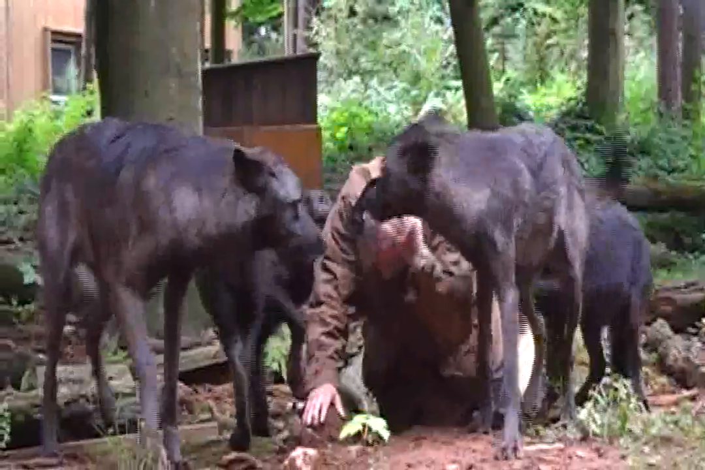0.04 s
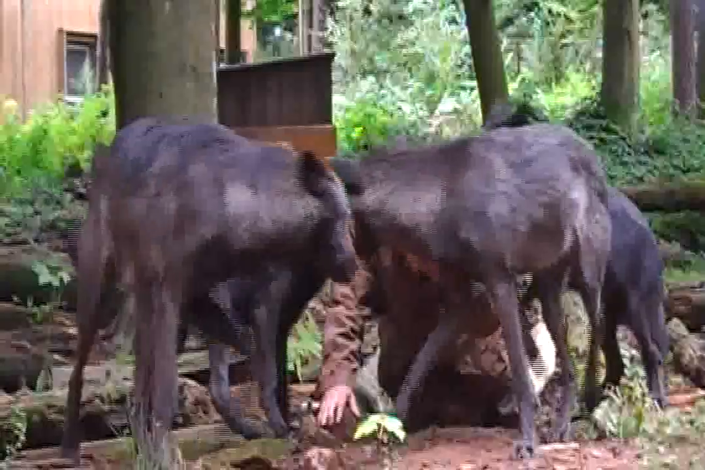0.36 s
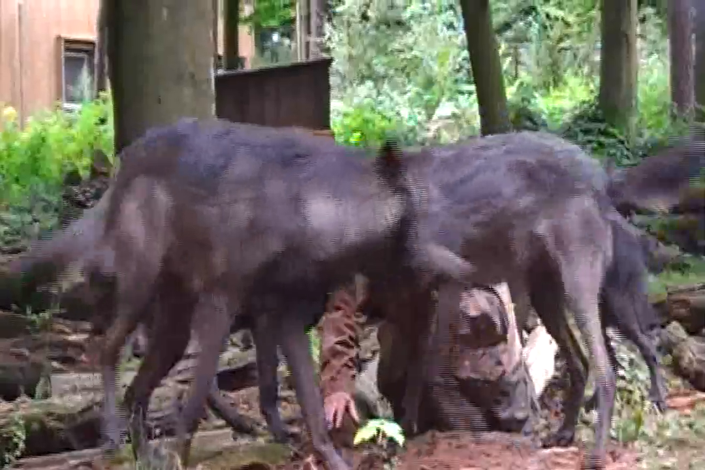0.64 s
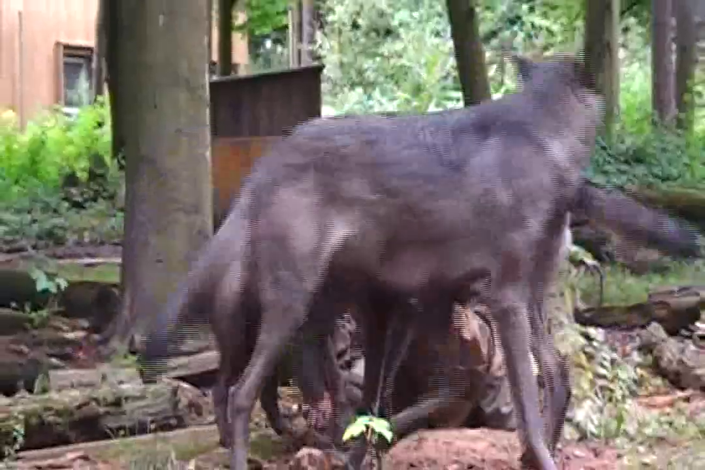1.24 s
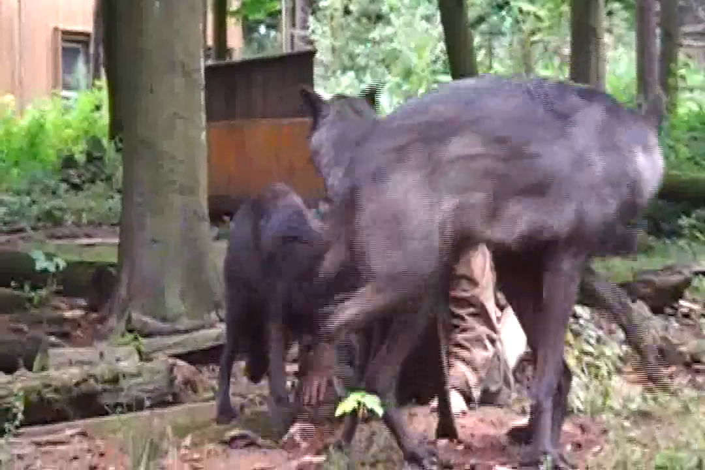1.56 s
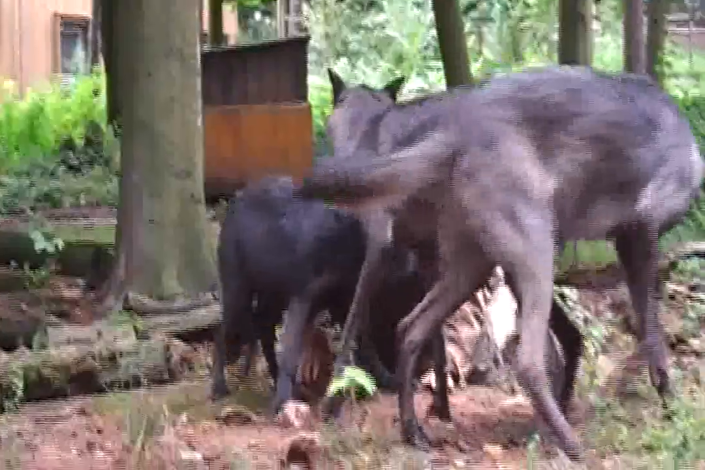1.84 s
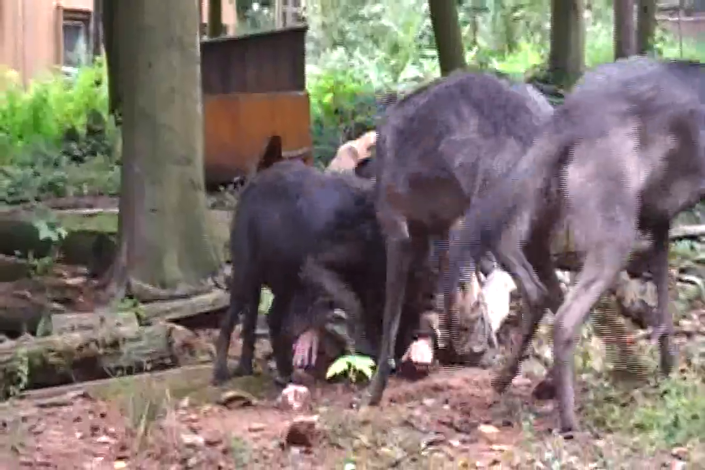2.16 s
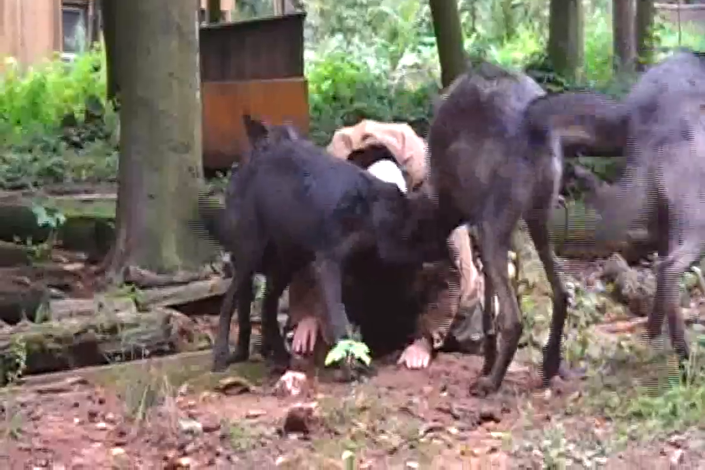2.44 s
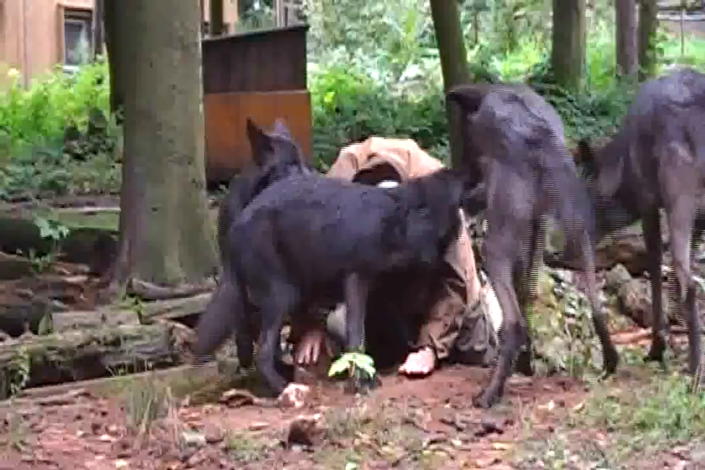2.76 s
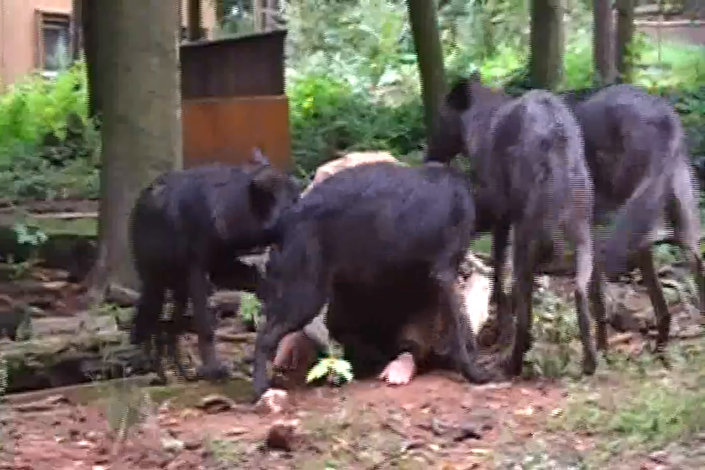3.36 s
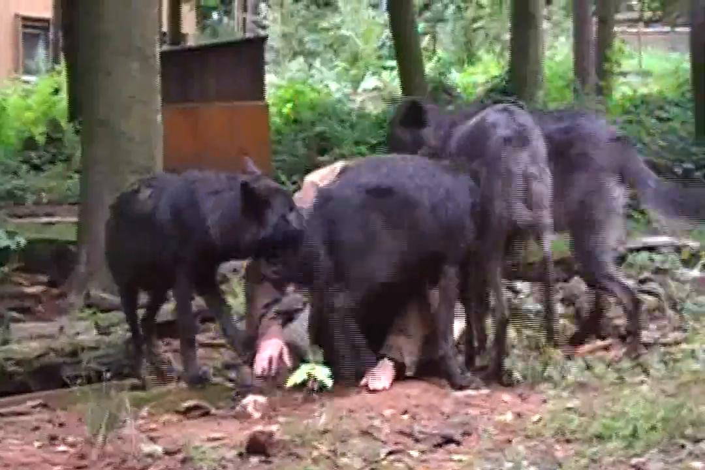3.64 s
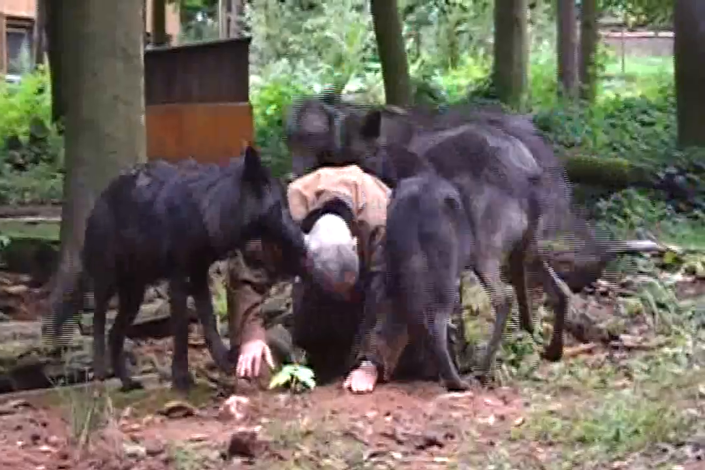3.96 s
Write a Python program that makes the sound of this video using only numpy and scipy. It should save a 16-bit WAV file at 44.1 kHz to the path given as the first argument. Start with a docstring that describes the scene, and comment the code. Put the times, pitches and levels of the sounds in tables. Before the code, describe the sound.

A wolf holds a single falling howl over thin whines and paws rustling dry leaves.

```python
"""One long, nearly pure wolf howl sinks in pitch, its overtones weakening as the mouth closes.
Pack mates mill about close by with thin nasal whines, roughened by turbulence, and a few whimpers
and snuffles. Their paws thud and rustle on dry litter, over forest air and a low rumble.
Other wolves howl faintly far off, and scattering among the trunks gives a light echo."""
import sys
import numpy as np
from scipy import signal
from scipy.fft import rfft, irfft, next_fast_len
from scipy.io import wavfile
from scipy.ndimage import uniform_filter1d, map_coordinates

SR = 44100
rng = np.random.default_rng(int(sys.argv[2]) if len(sys.argv) > 2 else 0)


def pcm_store(signal):
    """Save signal as 16-bit PCM."""
    levels = np.round(np.clip(np.atleast_2d(signal), -1, 1) * 32767)
    wavfile.write(sys.argv[1], SR, levels.astype(np.int16).T)


N = 176400
DIFFUSE_SIDE, CLOSE_SIDE = 0.4, 0.073  # stereo width: side over mid amplitude
SIDES = np.array([[.5], [-.5]])  # splits a left-right difference between the channels


def amp(db):
    """Decibels to amplitude ratio."""
    return 10 ** (np.asarray(db) / 20)


def unit(x):
    """Normalisation to rms 1."""
    return x / np.sqrt(np.mean(x ** 2) + 1e-20)


def along(points, hz):
    """Interpolation of (Hz, value) points on a log frequency axis."""
    f, v = np.transpose(points)
    return np.interp(np.log(hz + 1), np.log(f + 1), v)


def curve(rows):
    """Interpolation of (seconds, value) points to every sample, with rounded corners."""
    times, values = np.transpose(rows)
    return uniform_filter1d(np.interp(np.arange(N) / SR, times, values), size=900, mode="nearest")


def wobble(rate, count=N):
    """Smooth random modulation, rate knots a second."""
    knots = rng.standard_normal(int(count * rate / SR) + 4)
    return map_coordinates(knots, [np.arange(count) * rate / SR], order=2)


def filtered(x, response):
    """Zero-phase filtering: the spectrum of x times a gain that depends on frequency."""
    size = next_fast_len(x.shape[-1] + 8192)
    return irfft(rfft(x, size) * response(np.fft.rfftfreq(size, 1 / SR)), size)[..., :x.shape[-1]]


def noise(spectrum, width):
    """Coloured mid-side stereo noise of rms 1."""
    mid, side = filtered(rng.standard_normal((2, N)), lambda hz: amp(along(spectrum, hz)))
    return unit(np.array([mid + width * side, mid - width * side]))


def puff(centre_hz, width, count):
    """Noise through one resonance, its width in log frequency."""
    resonance = lambda hz: 1 / (1 + (np.log((hz + 1) / centre_hz) / width) ** 2)
    return unit(filtered(rng.standard_normal(count), resonance))


def gate(length, rise_s=0.015, fall_s=0.0073):
    """Time axis and rise-hold-fall envelope of a short call."""
    t = np.arange(int(length * SR)) / SR
    return t, np.sin(np.pi / 2 * np.clip(np.minimum(t / rise_s, (length - t) / fall_s), 0, 1))


def add(track, start, x):
    """Superposition of x on the track, from start in seconds."""
    part = track[max(0, round(start * SR)):][:len(x)]
    part += x[:len(part)]


def tone(hz, octave_db):
    """A gliding sine and its octave: phase is the integral of frequency."""
    phase = 2 * np.pi * np.cumsum(hz) / SR
    return np.sqrt(2) * (np.sin(phase) + amp(octave_db) * np.sin(2 * phase))


def howl(jitter=0.001, shimmer_db=0.24):
    """A harmonic series: a strong fundamental, and weak overtones that sway as the head moves."""
    # Each row: time in seconds, fundamental in Hz.
    pitch = [(0.0, 620), (0.08, 631.8), (0.23, 622.8), (0.47, 627.3), (0.65, 616.5), (0.89, 617),
             (1.04, 600.8), (1.09, 606.6), (1.21, 610), (1.3, 598.1), (1.44, 605.3), (1.55, 592),
             (1.79, 585.2), (2.13, 564.3), (2.22, 566), (2.29, 555.7), (2.4, 556.3), (2.7, 524.8),
             (2.73, 532.4), (2.82, 536.3), (2.89, 525), (2.93, 526.8), (3.07, 519.0), (3.21, 495.6),
             (3.43, 477.4), (3.54, 463.5), (3.74, 448), (3.81, 436.4), (3.92, 427), (3.99, 416)]
    # Harmonics 1 to 7. Each row: time in seconds, level in dB.
    fundamental = [(0.0, -12.5), (0.18, -10.5), (0.29, -13.0), (0.38, -12), (0.52, -14.5), (0.58, -21),
                   (0.8, -14.5), (0.87, -14.5), (0.97, -11.5), (1.02, -13.0), (1.24, -11), (1.3, -12.5),
                   (1.41, -12.0), (1.82, -15.0), (1.95, -14), (2.07, -10.5), (2.27, -10), (2.35, -12.0),
                   (2.42, -11.5), (2.55, -14), (2.6, -14.5), (2.86, -15.0), (3.04, -11.5), (3.1, -11.5),
                   (3.2, -16.0), (3.28, -15.5), (3.33, -19), (3.42, -16.5), (3.59, -22), (3.7, -22.0),
                   (3.83, -19.0), (4.0, -21.5)]
    octave = [(0.0, -36.5), (0.26, -40.0), (0.53, -33), (1.44, -39.0), (1.49, -34.5), (1.78, -29.5),
              (2.02, -37.0), (2.78, -36.0), (2.99, -41.0), (3.15, -32.5), (3.34, -54.5), (3.6, -61),
              (3.72, -45.5), (3.82, -59), (4.0, -46)]
    third = [(0.0, -60.5), (0.45, -50.0), (0.73, -64), (1.7, -65.5), (1.93, -54.5), (4.0, -66.5)]
    fourth = [(0.0, -39.5), (0.11, -47.5), (0.16, -40.5), (0.39, -37.5), (0.5, -32.0), (0.72, -43),
              (0.91, -32.5), (0.94, -38), (1.2, -35), (1.32, -44.5), (1.58, -37), (1.95, -57.5),
              (2.49, -59), (3.21, -73.0), (3.81, -70.5), (3.83, -58), (4.0, -66.0)]  # strong while the mouth is open
    fifth = [(0.0, -53), (0.121, -45.0), (0.48, -52), (0.61, -72.5), (0.9, -48), (1.36, -59.5),
             (1.53, -49.5), (2.33, -67.0), (3.63, -72), (3.76, -56.5), (4.0, -82)]
    sixth = [(0.0, -43), (0.22, -60.5), (0.27, -50.5), (0.471, -44), (0.56, -64.5), (1.09, -53.5),
             (1.609, -61.5), (1.69, -45.5), (1.79, -59.5), (2.1, -46.5), (2.41, -70.0), (2.44, -60),
             (4.0, -75)]
    seventh = [(0.0, -58.5), (0.78, -61.5), (0.9, -71), (1.839, -49.5), (2.59, -74.5), (3.15, -69.5),
               (3.41, -56), (4.0, -84.5)]
    # Common envelope of the high overtones. Each row: time in seconds, level in dB.
    edge = [(0, -60.5), (1.8, -66.5), (2.8, -77), (4, -72)]
    # Each entry: harmonic number, offset from that envelope in dB.
    high_overtones = {8: -11, 9: 0.97, 10: -1, 11: -3, 13: -16.5}
    # Each row: time in seconds, the fundamental's left-minus-right level in dB.
    pan = [(0.0, 1.0), (1.8, -0.5), (1.93, -3.0), (2.05, -0.5), (2.45, -0.5), (2.64, -3.5), (3.4, -1.5),
           (3.72, 1.5), (4.0, 1)]
    # Each row: time in seconds, phase lead of the left side in radians.
    left_lead = [(0, .45), (1.8, .52), (2.8, .4), (3.3, .08), (4, .08)]
    hz = curve(pitch) * (1 + jitter * wobble(60))
    phase = 2 * np.pi * np.cumsum(hz) / SR
    shift = SIDES * curve(left_lead)
    partial = lambda k, db, pan_db: np.sqrt(2) * amp(db + SIDES * pan_db) * np.sin(k * phase + shift)
    out = partial(1, curve(fundamental) + shimmer_db * wobble(40), pan_db=curve(pan))
    out += partial(1.9983, curve(octave) + .5 * wobble(23), pan_db=2.5)
    for k, level in enumerate((third, fourth, fifth, sixth, seventh), 3):
        out += partial(k, curve(level) + 1.4 * wobble(22), pan_db=2.7 * wobble(2.1))
    for k, offset_db in high_overtones.items():
        out += partial(k, curve(edge) + offset_db + 4 * wobble(16), pan_db=2 * wobble(5.8))
    return out


def forest_air(air_db=-50.5, rumble_pan_db=-3):
    """Broadband noise of forest air, with an amplitude-modulated low rumble growing beneath it."""
    # Spectra. Each row: frequency in Hz, relative level in dB.
    air_spectrum = [(20, -27), (70, -10.5), (130, -6), (300, -2.5), (950, -3), (1500, -13), (2800, -16),
                    (3800, -10), (4900, -22), (6500, -23), (8300, -24), (15000, -43)]
    rumble_spectrum = [(20, -24.5), (45, -8.5), (70, -2.5), (110, -10.5), (200, -8.5), (500, -28),
                       (2000, -69)]
    # Each row: time in seconds, level in dB.
    rumble_level = [(0, -80), (.7, -78), (1.3, -64.5), (2.25, -57.5), (2.6, -61.5), (3.3, -56), (4, -59)]
    air = amp(air_db + wobble(18)) * noise(air_spectrum, DIFFUSE_SIDE)
    rumble = amp(curve(rumble_level) + SIDES * rumble_pan_db) * noise(rumble_spectrum, DIFFUSE_SIDE)
    return air + rumble


def paws(thud_rise_s=0.0071, thud_t60_s=0.13, snap_rise_s=.003, grain_db=3.5):
    """Impacts with exponential decay: paws thud on earth and sticks, and dry litter shifts and snaps."""
    # Each row: start in seconds, level in dB before an 8 dB lift, centre in Hz, width in log frequency.
    footfalls = [(.375, -43.5, 665, 0.2), (1.322, -51, 2000, 0.27), (1.359, -46.5, 338, 0.48),
                 (1.415, -45, 125, .6), (1.281, -51, 110, .6), (2.178, -48.5, 88.6, 0.9),
                 (2.312, -50, 88.2, .6), (2.415, -41, 405.6, 0.44), (3.271, -44.5, 114.4, .6),
                 (3.811, -51, 100, 0.59)]
    # Twigs and leaves under a paw. Each row: start in seconds, level in dB, 60 dB decay time in seconds.
    crackles = [(.805, -49, .06), (2.736, -51.5, .14), (2.834, -53, 0.11), (3.05, -46, .052),
                (3.265, -41, .07), (3.345, -53, .08), (3.485, -51, 0.061), (3.629, -39.5, .11)]
    # Each row: time in seconds, level in dB.
    rustle = [(0, -61.5), (.6, -64.5), (1.6, -64), (2.3, -58.5), (2.65, -62.5), (3.2, -60), (3.4, -54),
              (3.6, -54), (3.72, -65.5), (4, -52)]
    # Each row: frequency in Hz, relative level in dB.
    leaf_spectrum = [(300, -6), (1000, -3), (2500, 2.5), (4300, 0), (6500, -9), (9000, -11.5), (13000, -21),
                     (16000, -25.5)]
    thuds, t = np.zeros(N), np.arange(SR // 3) / SR
    litter_env = amp(curve(rustle) + 1.5 * wobble(34))
    for start, db, hz, width in footfalls:
        env = amp(db + 8 - 60 * t / thud_t60_s) * (1 - np.exp(-t / thud_rise_s))
        add(thuds, start, env * puff(hz, width, len(t)))
    for start, db, t60 in crackles:
        add(litter_env, start, amp(db - 60 * t / t60) * (1 - np.exp(-t / snap_rise_s)))
    grains = unit(amp(grain_db * wobble(700)) * noise(leaf_spectrum, CLOSE_SIDE))
    return thuds + litter_env * grains


def whines(waver=.02, rasp=.035, smear_depth=0.25, smear_hz=863, flutter_db=3.2, swing_rad=.27):
    """Spectral broadening: turbulence smears the partials of nasal whistles as breath hisses along."""
    # Each row: start and length in seconds, first, middle and last pitch in Hz, level in dB,
    # octave and breath in dB relative to that level, roughness from 0 to 1.
    calls = [(.008, 0.025, 5000, 4650, 3860, -35, -16.5, -9.5, 0.8),
             (0.157, .036, 3800, 4080, 4590, -41, -7.5, -20, 0.4),
             (0.221, 0.1, 4850, 4990, 5080, -51, -2.5, -3, .3),
             (0.302, .088, 5080, 5070, 5040, -43.5, -8.5, -7, 0.2),
             (0.381, 0.084, 5050, 4920, 4800, -48.5, -13, 0.5, 0.8),
             (0.619, 0.16, 3750, 3900, 3540, -54, -27.5, -18.5, .3),
             (1.458, .031, 3760, 3770, 3900, -38, -25.5, -15.5, .4),
             (1.662, 0.18, 3650, 4093, 3933, -46.5, -28.5, -20.5, .25),
             (1.791, 0.092, 3400, 3370, 3300, -53, -29.5, -20, .3),
             (1.84, 0.032, 4000, 4306, 4700, -40, -15, -14, .6),
             (1.879, .065, 4700, 4710, 4100, -44, -11.5, -9, 0.77),
             (2.108, 0.073, 4600, 4820, 4910, -45, -16, -12, .3),
             (2.168, 0.12, 4750, 5240, 5470, -41.5, -8.5, -14.5, 0.46),
             (2.283, 0.12, 5600, 5470, 5424, -37.5, -6.5, -8.5, .55),
             (2.4, 0.093, 5430, 5204, 4990, -36, -6.5, -12, .7),
             (2.633, 0.096, 4330, 4280, 4145, -50.5, -19.5, -19, 0.3),
             (2.745, .092, 4130, 3960, 3790, -46.5, -28, -17.5, .35),
             (2.985, 0.078, 4486, 4380, 4310, -51, -27.5, -13, .28),
             (3.063, .028, 4050, 3530, 3420, -41.5, -22.5, -11.5, 0.3),
             (3.369, 0.047, 4200, 4100, 3930, -49.5, -18.5, -14.5, 0.5),
             (3.428, .2, 5300, 5870, 5690, -54.5, -15.5, 3.5, 0.5),
             (3.641, 0.04, 4500, 4110, 3370, -44.5, -19, -13.5, 0.4),
             (3.738, 0.036, 3150, 3237, 3577, -46, -16, -17, 0.3),
             (3.795, 0.15, 3730, 4270, 3820, -46, -20, -10.5, .5)]
    # Air through the nose. Each row: frequency in Hz, relative level in dB.
    breath_spectrum = [(400, -17), (1200, -9), (1800, 0), (2900, -3), (4400, 3.5), (5800, -8),
                       (7200, -12.5), (8500, -9.5), (9500, -15.5), (11000, -12), (14000, -21),
                       (16000, -40.5)]
    left, right, breath_env = np.zeros((3, N))
    for start, length, first_hz, mid_hz, last_hz, db, octave_db, breath_db, rough in calls:
        t, env = gate(length)
        n = len(t)
        arch_hz = np.polyval(np.polyfit([0, .5, 1], [first_hz, mid_hz, last_hz], 2), t / length)
        jitter = rough * (waver * wobble(130, n) + rasp * wobble(2500, n))
        phase = 2 * np.pi * np.cumsum(arch_hz * (1 + jitter)) / SR
        for k, level_db in ((1, db), (2, db + octave_db)):
            smear = 1 + rough * smear_depth * (wobble(smear_hz, n) + 1j * wobble(smear_hz, n))
            whistle = env * amp(level_db + flutter_db * wobble(110, n)) * smear * np.exp(1j * k * phase)
            swing = np.exp(1j * swing_rad * wobble(28, n))  # opposite phase shifts left and right
            add(left, start, (whistle * swing).real)
            add(right, start, (whistle / swing).real)
        add(breath_env, start, env * amp(db + breath_db))
    hiss = uniform_filter1d(breath_env, size=2200) * noise(breath_spectrum, CLOSE_SIDE)
    return np.array([left, right]) + hiss


def trees(x):
    """Diffuse reverberation among the trunks: each frequency decays at its own rate."""
    # Each row: frequency in Hz, 60 dB decay time in seconds.
    decay_times = [(300, 0.95), (2000, 1), (5000, 0.63), (11000, 0.37)]
    # Each row: frequency in Hz, gain of the echo in dB.
    colour = [(2000, 1), (4200, -1.5), (5200, 3.5), (8000, -3.5), (10500, 4)]
    hz, t, spectra = signal.stft(rng.standard_normal((2, SR)), SR, nperseg=256)
    decay = amp(-60 * t / along(decay_times, hz)[:, None])
    mid, side = signal.istft(spectra * decay, SR, nperseg=256)[1]
    tail = np.array([mid + DIFFUSE_SIDE * side, mid - DIFFUSE_SIDE * side])
    echo = signal.fftconvolve(x, tail / np.linalg.norm(tail[0]), axes=1)[:, :N]
    return filtered(echo, lambda f: amp(along(colour, f)))


def far_howls(waver=.004):
    """Slight frequency modulation makes the faint tones of distant wolves waver."""
    # Each row: start and length in seconds, pitch in Hz, level in dB.
    calls = [(0.982, 0.51, 811, -59.5), (1.02, 0.34, 1008, -59), (1.464, 0.37, 890, -57.5)]
    out = np.zeros(N)
    for start, length, hz, db in calls:
        n = int(length * SR)
        voice = tone(hz * (1 + waver * wobble(33, n)), octave_db=-24.5)
        add(out, start, amp(db) * signal.windows.tukey(n) * voice)
    return out


def whimpers(rasp=0.016):
    """Fast frequency jitter roughens the short, gliding squeaks of the jostling wolves."""
    # Each row: start and length in seconds, first and last pitch in Hz, level and relative octave in dB.
    calls = [(2.271, 0.12, 1224, 1370, -45.5, -15.5), (2.415, 0.015, 820, 769.3, -36, -26.5),
             (2.705, 0.049, 776, 850, -38.5, -30), (2.748, 0.07, 853, 920, -45.5, -17),
             (3.837, 0.053, 1194, 1286, -44, -12)]
    out = np.zeros(N)
    for start, length, first_hz, last_hz, db, octave_db in calls:
        t, env = gate(length)
        hz = np.linspace(first_hz, last_hz, len(t)) * (1 + rasp * wobble(350, len(t)))
        add(out, start, amp(db) * env * tone(hz, octave_db))
    return out


def snuffles(flutter_db=4.3):
    """A resonance shapes each fluttering puff of breath noise."""
    # Each row: start and length in seconds, centre in Hz, level in dB.
    breaths = [(2.309, 0.11, 1950, -53), (2.399, .12, 1680, -52.5), (3.501, .084, 1784, -51),
               (3.558, 0.074, 2110, -52), (3.601, .05, 1330, -46.5), (3.841, .06, 1620, -49),
               (3.961, .041, 1457, -51.5)]
    out = np.zeros(N)
    for start, length, hz, db in breaths:
        t, env = gate(length)
        gain = amp(db + flutter_db * wobble(150, len(t)))
        add(out, start, gain * env * puff(hz, width=.08, count=len(t)))
    return out


def scene(howl_send_db=-29, pack_send_db=-10):
    """Superposition of the near voices, their echo and the sounds of the forest."""
    soloist = howl()
    pack = whines() + whimpers() + snuffles()
    echo = trees(amp(howl_send_db) * soloist + amp(pack_send_db) * pack)
    return soloist + pack + echo + forest_air() + far_howls() + paws()


def record(dry, cutoff_hz=15000):
    """Band limiting: a steep low-pass removes the highest treble."""
    return filtered(dry, lambda hz: 1 / (1 + (hz / cutoff_hz) ** 80))


dry = scene()
out = record(dry)
pcm_store(out)
```